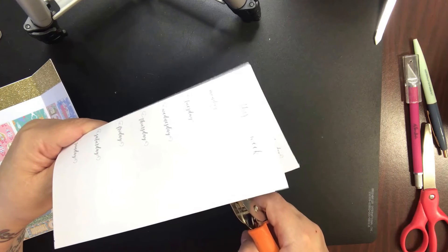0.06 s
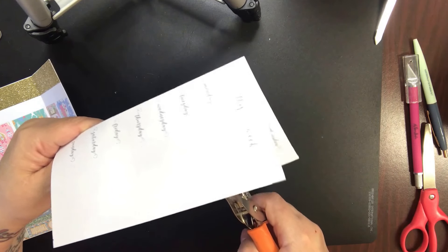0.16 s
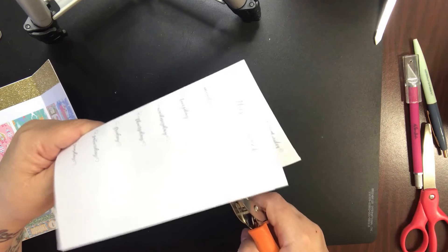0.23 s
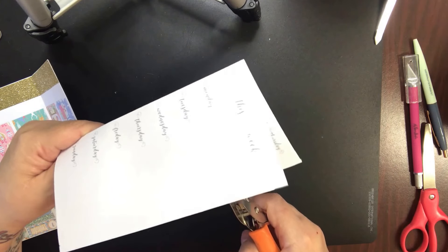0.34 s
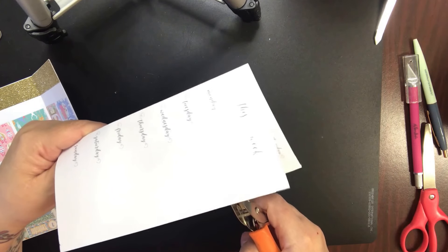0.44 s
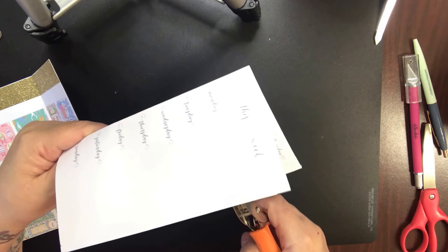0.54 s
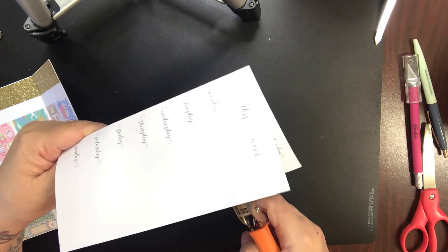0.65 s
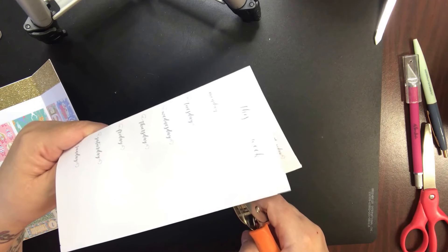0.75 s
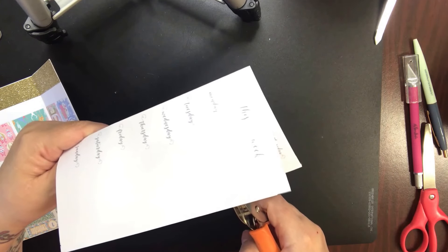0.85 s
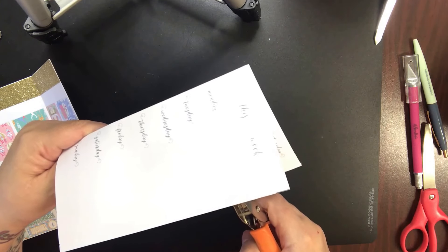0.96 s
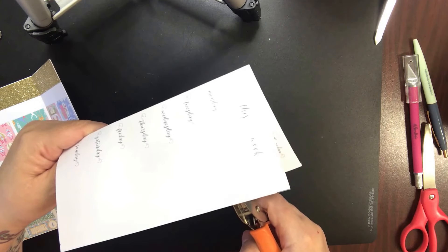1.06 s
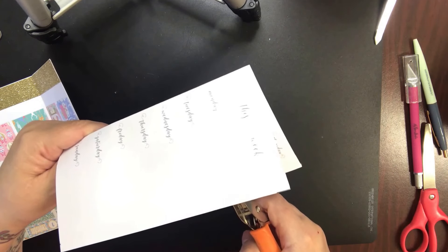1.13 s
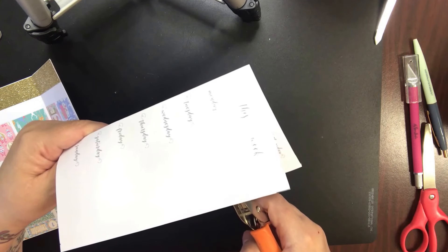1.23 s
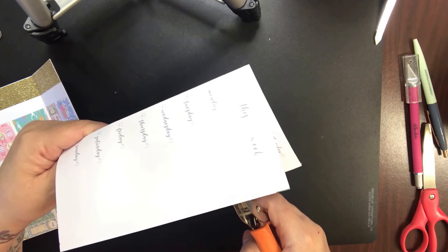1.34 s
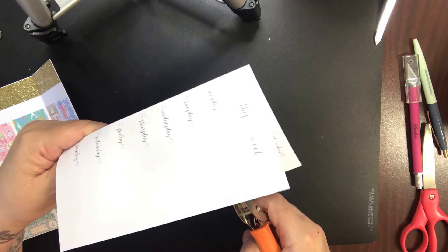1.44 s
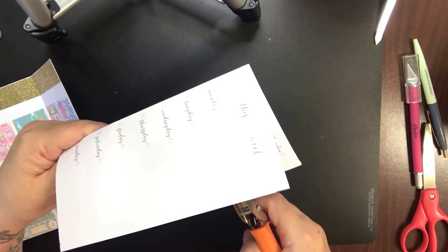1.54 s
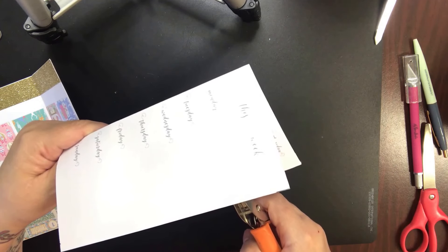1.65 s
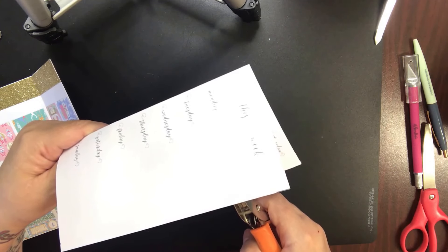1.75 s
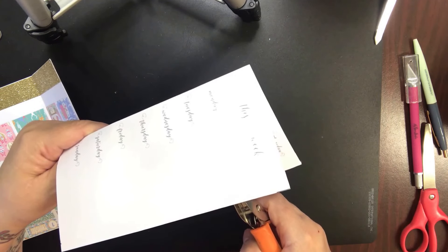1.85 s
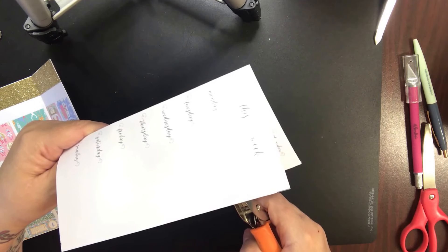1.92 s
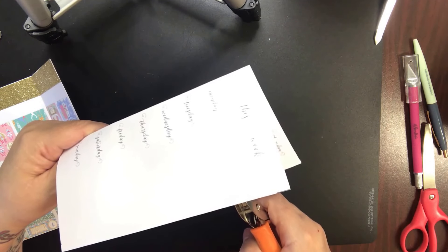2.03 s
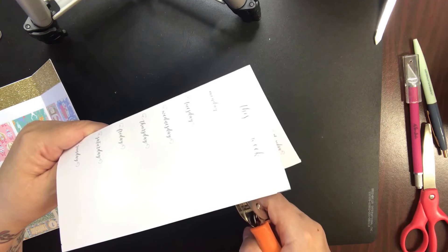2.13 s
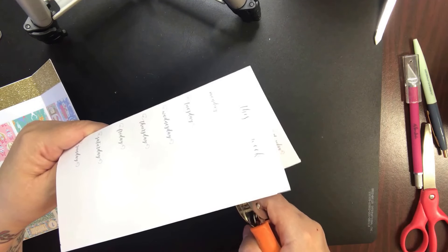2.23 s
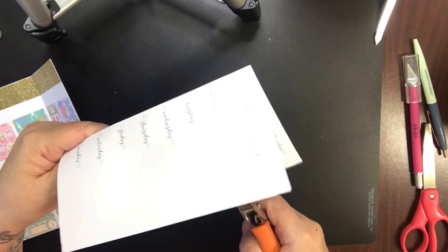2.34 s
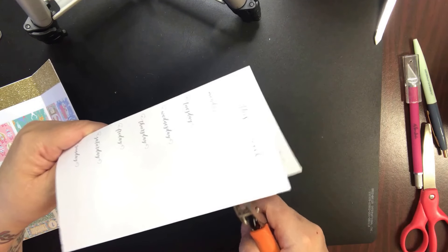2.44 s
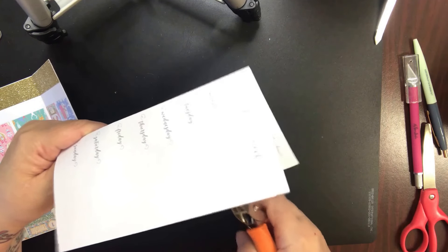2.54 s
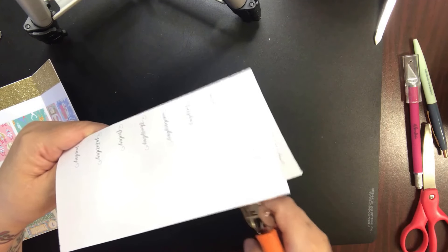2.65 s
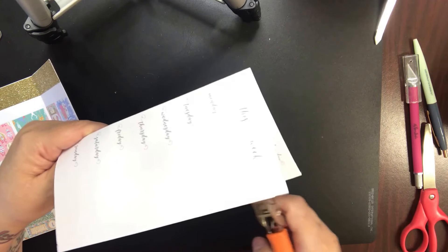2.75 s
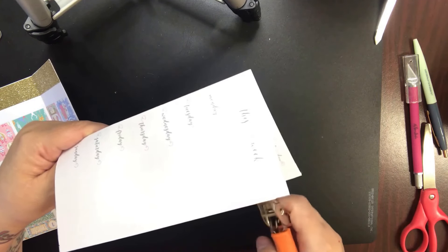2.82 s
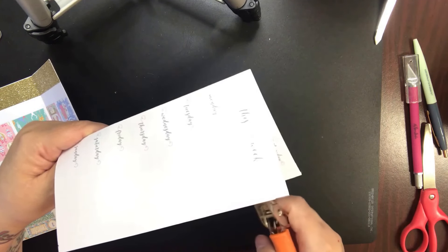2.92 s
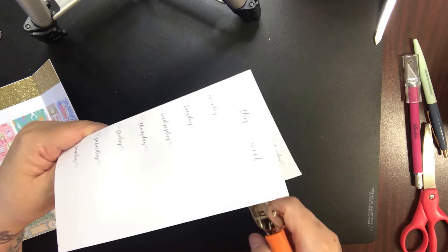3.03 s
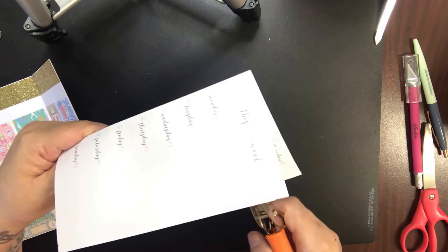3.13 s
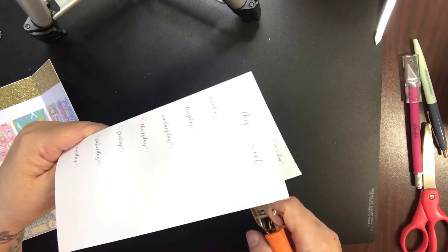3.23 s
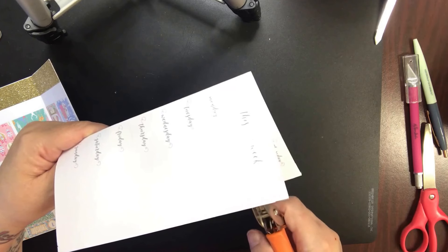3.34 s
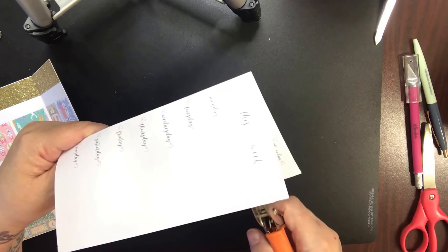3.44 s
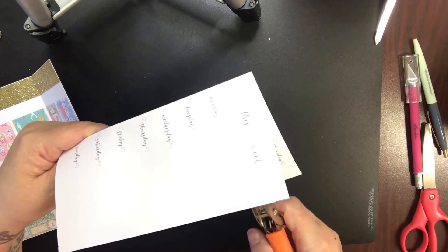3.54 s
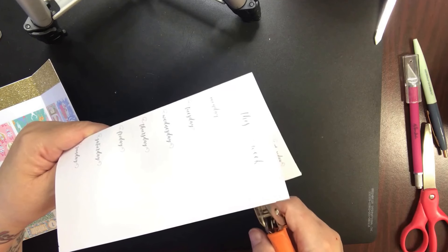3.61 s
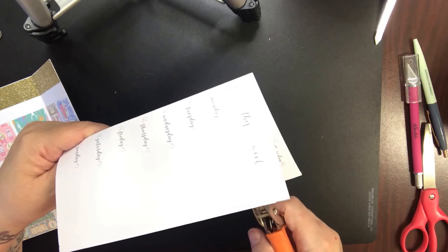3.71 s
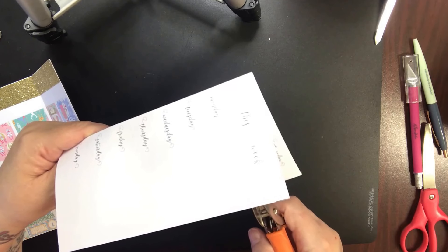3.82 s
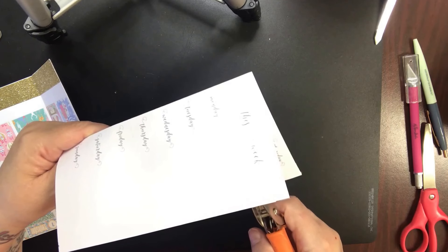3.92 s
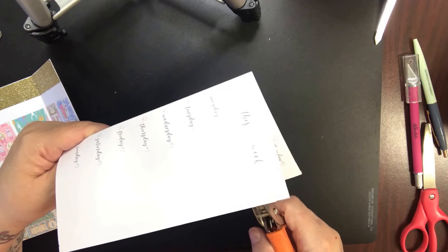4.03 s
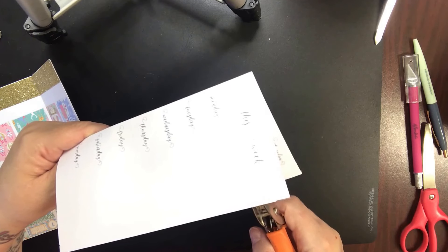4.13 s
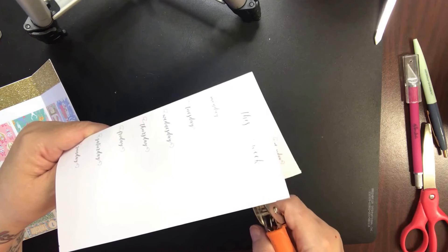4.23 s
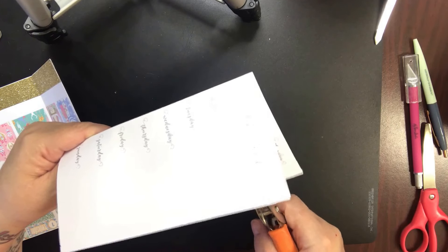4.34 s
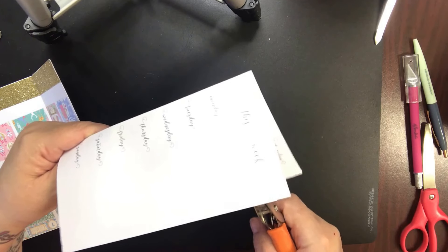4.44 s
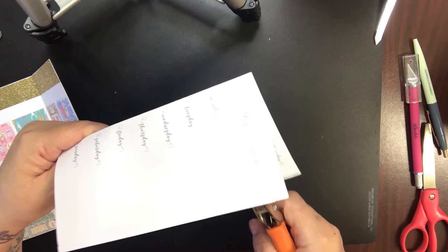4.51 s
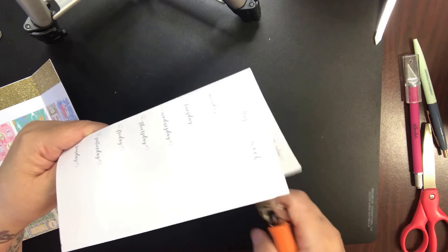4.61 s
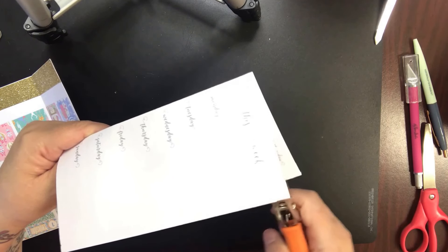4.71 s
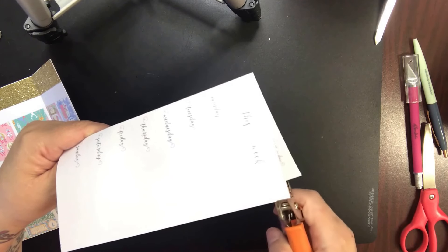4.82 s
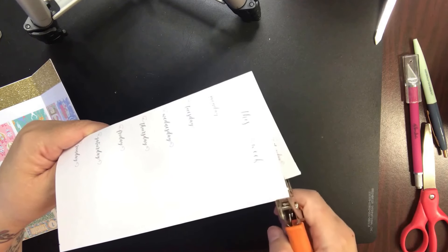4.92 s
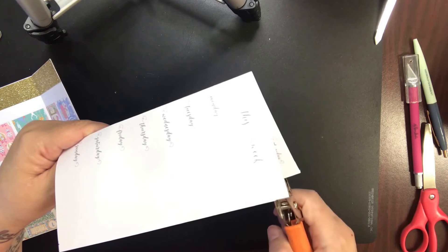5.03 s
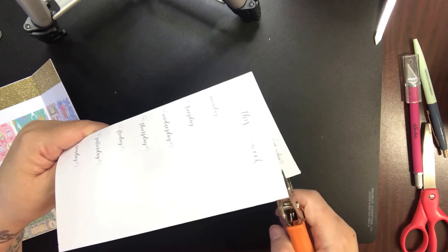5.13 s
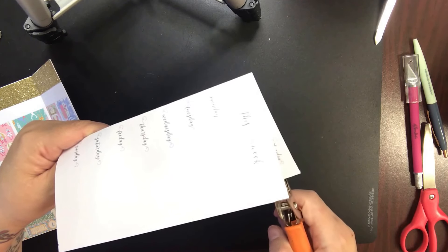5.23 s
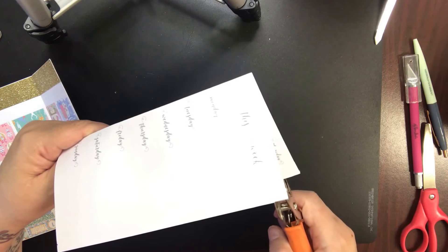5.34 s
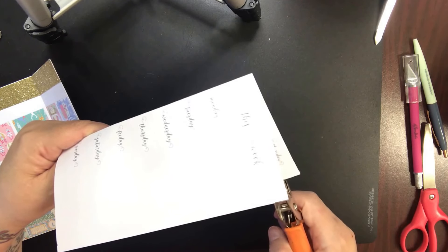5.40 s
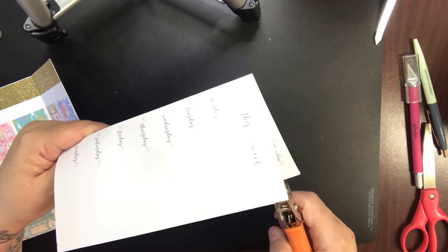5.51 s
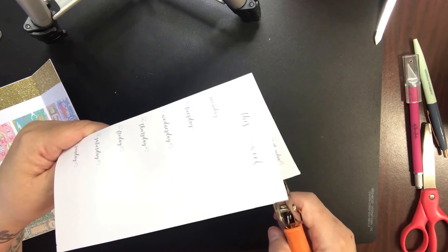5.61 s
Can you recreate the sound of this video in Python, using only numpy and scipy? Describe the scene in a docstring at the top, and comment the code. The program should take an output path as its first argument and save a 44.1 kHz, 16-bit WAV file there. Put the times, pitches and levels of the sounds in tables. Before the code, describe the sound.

A handheld metal hole punch crunches twice through paper with sharp clicks and spring-back snaps, over a low throbbing hum in a small room.

```python
"""Hole punch in a small room

A steel hole punch is squeezed twice through paper held above a desk: after a soft handling tick, the jaws close
on the sheets, the pin shears through, the spring pulls it back and the punch slides off the paper. Each contact
is a burst of dense tiny impacts with a steel ring and a paper boom; the rubbing and creaking paper is grainy
noise in bands. Two motors, built from cosines, drone and beat over filtered noise: ventilation rush and
microphone hiss.
"""
import sys
import numpy as np
from scipy import signal
from scipy.fft import rfft, irfft, next_fast_len
from scipy.io import wavfile
from scipy.ndimage import map_coordinates

SR = 44100
rng = np.random.default_rng(int(sys.argv[2]) if len(sys.argv) > 2 else 0)


def dump_mix(stems):
    """Bounce the given channels to the path in sys.argv[1] as a 16-bit WAV at rate SR."""
    frames = np.atleast_2d(stems).T  # one column per channel
    limited = np.clip(frames, -1, 1)  # hard clip at full scale
    pcm = np.round(limited * 32767).astype(np.int16)
    wavfile.write(sys.argv[1], SR, pcm)


N = 249870  # length of the scene in samples

# Ringing tones of the punch. Each row: pitch in Hz, relative level in dB, time to fade by 60 dB in s.
STEEL_TONES = [(1040, -1, .07), (1300, -14, .07), (1448, 0, .056), (2150, -17, .045), (3450, -24, .05),
               (5740, -25, .04), (7990, -30, .04), (9600, -30, .045)]
# Boom of the held sheets. Each row: centre in Hz, width in Hz, relative level in dB.
SHEET_BOOM = [(230, 80, -6), (360, 100, 0), (550, 130, -1), (715, 120, -1)]
# Hand-damped steel, the body of a click. Each row: centre in Hz, width in Hz, relative level in dB.
CLICK_BODY = [(1110, 970, -7), (1870, 400, 4), (2310, 448, 1), (3060, 160, -7), (3470, 265, -5.5),
              (4240, 160, -12.5), (4490, 230, -11.5)]
# Treble of a click. Each row: frequency in Hz, relative level in dB.
CLICK_TREBLE = [(2060, -23), (3500, -2.5), (4740, -2.5), (7020, -7), (7930, -16), (9260, -5.5),
                (9690, -14.5), (14900, -13.5), (16300, -22.5)]
# Knock of the clamped jaws. Each row: centre in Hz, width in Hz, relative level in dB.
JAW_KNOCK = [(990, 206, 0)]
# The four tables of steel contacts share their columns.
# Each row: time of the peak in s, peak of the click in dB, treble against the body in dB, rise in ms.
# The jaws meet; the first row is a soft tick as the punch and paper are handled:
LANDINGS = [(0.166, -43.5, -18, 2.9), (2.1639, -28.5, -5, 0.46), (4.1467, -34, -7, 0.32)]
# The pin digs into the sheets:
BITES = [(2.099, -56, 13, 1.1), (2.291, -41, 3, 1.4), (2.3, -35.5, 0.5, 2.7), (2.364, -33, -1, 2.4),
         (4.279, -52, -12, 1.3), (4.312, -33.5, -4, 3)]
# The pin breaks through:
SHEARS = [(2.380, -9, -12, 0.86), (4.399, -18.5, -5, 3.7)]
# The pin springs back and tugs the sheets; the row at 4.411 s is a bounce just after the second shear:
RETURNS = [(2.534, -50, -1, 1.2), (2.553, -41.5, -9, 1.4), (2.558, -41, -8, 2), (2.569, -31, -6, 0.72),
           (2.5783, -21, -3, 0.73), (4.411, -33.5, -6, 1.2), (4.5603, -48, -7, 1), (4.5807, -33, -22, 0.49),
           (4.611, -28.5, -8, 4), (4.615, -15.5, -8, 1.2), (4.624, -34, -8, 1.5)]
# What each group of contacts shares. Each row: its contacts, paper thud in dB, jaw knock in dB,
# ring in dB before the loss below, fall in ms.
STAGE_SETTINGS = [(LANDINGS, -44, -5, -5.5, 4.9), (BITES, -25, -3.5, -1.5, 4.5),
                  (SHEARS, -29, -1.1, -19, 3.75), (RETURNS, -5, -8.5, -23, 4.3)]
RING_LOSS_DB_PER_MS = 6.5  # the slower a contact builds, the less the steel rings


def punch():
    """Each contact is a few ms of grating steel that rings the punch and jolts the sheets."""
    out = np.zeros(N)
    t = np.arange(-SR // 50, SR // 6) / SR  # seconds from the peak of the contact
    for contacts, thud_db, jaw_db, ring_db, fall_ms in STAGE_SETTINGS:
        for peak_s, peak_db, treble_db, rise_ms in contacts:
            side_ms = np.where(t < 0, rise_ms, fall_ms)
            envelope = np.sqrt(np.exp(-np.abs(1000 * t / side_ms) ** 1.7))
            click = steel_click(envelope, jaw_db, treble_db)
            ring = amp(ring_db - RING_LOSS_DB_PER_MS * rise_ms) * steel_ring(t)
            jolt = filtered(burst(envelope), resonances(SHEET_BOOM))
            thud = amp(thud_db) * jolt / np.abs(jolt).max()
            contact = amp(peak_db) * (click + ring + thud)
            add(out, peak_s + t[0], surroundings(contact, wet_db=-14.5))
    return out


def steel_click(envelope, jaw_db, treble_db):
    """Tiny impacts shake the damped steel and the jaws; separate ones give the treble. The peak is 1."""
    push = burst(envelope)
    body = unit(filtered(push, resonances(CLICK_BODY)))
    knock = unit(filtered(push, resonances(JAW_KNOCK)))
    treble = unit(filtered(burst(envelope), lambda hz: amp(along(CLICK_TREBLE, hz))))
    click = body + amp(jaw_db) * knock + amp(treble_db) * treble
    return click / np.abs(click).max()


def steel_ring(t):
    """The steel's tones start at the peak and die at their own speeds; their levels vary by contact."""
    after = np.maximum(t, 0)
    ring = np.zeros(len(t))
    for hz, level_db, fade_s in STEEL_TONES:
        tone_db = level_db + rng.normal(0, 1.2) - 60 * after / fade_s
        ring += amp(tone_db) * np.sin(2 * np.pi * hz * after)
    return ring


# Paper rubbing on paper and steel.
# Each row: start in s, length in s, level in dB before the fades, centre in Hz.
PAPER_RUBS = [(0.143, 0.024, -68, 5800), (0.158, 0.045, -58.5, 3970), (0.209, 0.035, -67, 3320),
              (0.27, 0.021, -65, 2900), (0.434, 0.028, -56, 3940), (0.723, 0.029, -70, 3950),
              (0.864, 0.01, -71, 4940), (2.645, 0.034, -61, 5000), (2.662, 0.064, -54.5, 2940),
              (2.74, 0.062, -69, 5500), (2.973, 0.061, -65, 4270), (4.287, 0.04, -65, 7940),
              (4.647, .045, -61, 4000), (4.666, 0.041, -53.5, 6200), (4.7, 0.046, -53, 3600),
              (4.743, 0.072, -71.5, 4400), (5.251, 0.35, -77, 4180), (5.602, 0.041, -70.5, 4350)]
RUB_OCTAVES, WIDER_OCTAVES_PER_DB = 0.67, 0.018  # width of a -65 dB rub; harder rubs spread wider
# The squeezed sheets creak until just before the pin breaks through.
CREAK_LEAD_S, CREAK_S, CREAK_DB, CREAK_HZ, CREAK_OCTAVES = 0.076, 0.066, -63.5, 7350, 3.1


def paper():
    """Sliding sheets rub, and squeezed sheets creak before each shear."""
    out = np.zeros(N)
    for start_s, length_s, db, centre_hz in PAPER_RUBS:
        octaves = RUB_OCTAVES + WIDER_OCTAVES_PER_DB * (db + 65)
        rub = amp(db) * paper_stroke(length_s, centre_hz, octaves)
        add(out, start_s, surroundings(rub, wet_db=-13.0))
    for shear_s, *_ in SHEARS:
        creak = amp(CREAK_DB) * paper_stroke(CREAK_S, CREAK_HZ, CREAK_OCTAVES)
        add(out, shear_s - CREAK_LEAD_S, surroundings(creak, wet_db=-13.0))
    return out


def paper_stroke(length_s, centre_hz, octaves):
    """Fibres catch and let go: banded noise, chopped into uneven grains, fades in and out."""
    u = np.linspace(0, 1, round(length_s * SR))  # progress of the stroke
    bands_db = 3 * rng.standard_normal(60)  # each buckle of the sheet favours its own bands

    def colour(hz):
        """A broad hump around the centre, made uneven every 300 Hz."""
        distance = np.log2((hz + 1) / centre_hz) / octaves
        return np.exp(-0.5 * distance ** 2) * amp(np.interp(hz / 300, np.arange(len(bands_db)), bands_db))

    grains = amp(4 * noise(len(u), lambda hz: hz < 300))
    fades = np.clip(u / 0.2, 0, 1) * np.clip((1 - u) / 0.25, 0, 1)
    return fades * unit(grains * noise(len(u), colour))


SLOW_HZ, FAST_HZ, MAINS_HZ = 51.075, 58.92, 59.99
# Slower motor. Each row: order (multiple of the turning speed), level in dB.
SLOW_ORDERS = [(1, -59), (3, -57.5), (4, -59.5), (5, -65), (6, -69.5), (7, -75)]
# Faster motor above its first order. Each row: order, level in dB.
FAST_ORDERS = [(3, -82), (5, -73.5), (6, -64), (7, -74.5), (12, -91.5)]
# The faster motor's first order swells and sinks. Each row: time in s, level in dB.
FAST_ROOT_LEVELS = [(0, -65), (1.0, -60.5), (1.5, -58.5), (2.1, -60), (2.55, -74), (3.3, -68), (3.9, -65),
                    (4.3, -58), (5.67, -58.5)]
# Mains buzz. Each row: order (multiple of the mains frequency), level in dB.
MAINS_ORDERS = [(2, -68), (4, -82.5)]


def motors():
    """Two motors about 8 Hz apart throb together over a faint mains buzz."""
    time_s, root_db = np.transpose(FAST_ROOT_LEVELS)
    swell = amp(np.interp(np.arange(N) / SR, time_s, root_db))
    fast_root = swell * orders([(1, 0)], FAST_HZ, 0.0051, shaky_db=0.6)
    slow = orders(SLOW_ORDERS, SLOW_HZ, 0.0132, shaky_db=0.8)
    fast = orders(FAST_ORDERS, FAST_HZ, 0, shaky_db=0.14)
    buzz = orders(MAINS_ORDERS, MAINS_HZ, 0, shaky_db=0.0)
    return fast_root + slow + fast + buzz


def orders(table, hz, first_s, shaky_db):
    """Orders peak together once a cycle, with a wandering phase and levels that waver by shaky_db."""
    turn = 2 * np.pi * hz * (np.arange(N) / SR - first_s) + 0.17 * wobble(1.45)
    total = np.zeros(N)
    for order, db in table:
        level = np.sqrt(2) * amp(db + shaky_db * wobble(4.41))  # the root of 2 makes dB an rms level
        total += level * np.cos(order * turn)
    return total


# Ventilation. Each row: frequency in Hz, relative level in dB.
RUSH_COLOUR = [(15, -34), (25, -13), (59, -8), (97, -9), (133, -7.5), (165, -3.5), (295, -7), (400, -14),
               (480, -14), (800, -17.5), (1300, -15), (1650, -17), (1800, -24.5), (2600, -29.5),
               (5000, -120)]
# Duct resonances. Each row: centre in Hz, width in Hz, strength in dB.
DUCT_RESONANCES = [(172, 9, 9), (410, 25, 4), (700, 60, 4)]
# Microphone hiss. Each row: frequency in Hz, relative level in dB.
HISS_COLOUR = [(1060, -32), (1800, -24), (2200, -3), (2580, -3), (2800, -0.5), (3840, -1.5), (4790, -3.5),
               (6310, -5), (10300, -11.5), (11300, -10.5), (14600, -12), (15700, -13), (16300, -36)]


def air():
    """Ventilation rush through the duct resonances, and smooth microphone hiss, drift a little in level."""
    def ducts(hz):
        """Gain of the ducts: 1 plus a peak at each resonance."""
        return 1 + sum(amp(db) * peak(hz, centre, width) for centre, width, db in DUCT_RESONANCES)

    rush = noise(N, lambda hz: amp(along(RUSH_COLOUR, hz)) * ducts(hz))
    hiss = noise(N, lambda hz: amp(along(HISS_COLOUR, hz)))
    return amp(-57.5 + 0.9 * wobble(2.91)) * rush + amp(-73.5 + 0.5 * wobble(3.17)) * hiss


def surroundings(dry, wet_db):
    """A near sound with its bounces off the desk and the nearest wall, and the answer of the room."""
    heard = amp(wet_db) * room(dry)
    add(heard, 0, dry)
    add(heard, 0.0021, amp(-21.0) * dry)  # desk
    add(heard, 0.0105, amp(-17.5) * dry)  # nearest wall
    return heard


# How fast the room fades. Each row: frequency in Hz, time to fade by 60 dB in s.
ROOM_FADE = [(300, 0.15), (1000, 0.28), (3000, 0.37), (8000, 0.26), (15000, 0.31)]
# What the walls send back. Each row: frequency in Hz, relative level in dB.
WALL_COLOUR = [(200, 6), (600, 1), (1000, 2), (3000, -2), (7000, 0.5), (15000, -2.5)]


def room(x):
    """A fresh diffuse tail starts 9 ms late, and each frequency in it dies at its own speed."""
    hz, t, grid = signal.stft(rng.standard_normal(SR // 2), SR, nperseg=256)
    fade_db = along(WALL_COLOUR, hz)[:, None] - 60 * t / along(ROOM_FADE, hz)[:, None]
    tail = signal.istft(grid * amp(fade_db), SR, nperseg=256)[1]
    tail = tail * amp(1.8 * noise(len(tail), lambda f: f < 150))  # echoes arrive in uneven clumps
    echoes = signal.fftconvolve(x, tail / np.linalg.norm(tail))
    return np.pad(echoes, (round(0.009 * SR), 0))


def burst(envelope):
    """Dense micro-impacts under an envelope; their sum has an evener spectrum than plain noise."""
    x = envelope * rng.standard_normal(len(envelope))
    spectrum = rfft(x)
    even = irfft(spectrum / (np.abs(spectrum) + 1e-9), len(x))  # keep the phases, level the strengths
    return envelope * even


def amp(db):
    """Gain of a dB value."""
    return 10 ** (np.asarray(db) / 20)


def unit(x):
    """Scale a sound to rms 1."""
    return x / np.sqrt(np.mean(x ** 2) + 1e-20)


def along(points, hz):
    """Read values between (Hz, value) points on a log frequency axis."""
    point_hz, values = np.transpose(points)
    return np.interp(np.log(hz + 1), np.log(point_hz + 1), values)


def filtered(x, response):
    """Filter x by a response, real or complex, given as a function of frequency."""
    m = next_fast_len(x.shape[-1] + 8192)  # spare room for ringing
    spectrum = rfft(x, m) * response(np.fft.rfftfreq(m, 1 / SR))
    return irfft(spectrum, m)[..., :x.shape[-1]]


def noise(length, response):
    """Coloured noise of rms 1."""
    return unit(filtered(rng.standard_normal(length), response))


def wobble(rate):
    """A smooth random curve through `rate` random points a second."""
    points = rng.standard_normal(int(N * rate / SR) + 4)
    return map_coordinates(points, [np.arange(N) * rate / SR])


def peak(hz, centre, width):
    """A smooth peak of height 1 around a centre frequency."""
    return 1 / (1 + ((hz - centre) / width * 2) ** 2)


def resonances(modes):
    """Response of (Hz, width, dB) resonances that ring only after a push; signs alternate."""
    def response(f):
        """Sum of the resonances at frequency f."""
        total = 0
        for k, (centre, width, db) in enumerate(modes):
            damping = 1j * f * width
            total = total + (-1) ** k * amp(db) * damping / (centre * centre - f * f + damping)
        return total
    return response


def add(track, s, piece):
    """Mix a piece into the track at s seconds, cut off at the end of the track."""
    part = track[round(s * SR):][:len(piece)]
    part += piece[:len(part)]


def scene():
    """Punch and paper near the microphone, the drone of the room behind."""
    return (punch() + paper() + motors() + air())[None]


# Colour of the microphone housing. Each row: centre in Hz, width in Hz, boost or cut in dB.
MIC_HOUSING = [(4810, 350, -5), (5670, 390, 1.5), (10500, 280, -9.5)]
TOP_HZ = 15950  # the treble drops by 22 dB here and ends 520 Hz higher


def record(dry):
    """The microphone cuts the deep bass, is coloured by its housing and limits the treble."""
    def microphone(hz):
        """Gain of the housing and of the bass cut at about 40 Hz."""
        housing_db = sum(db * peak(hz, centre, width) for centre, width, db in MIC_HOUSING)
        return amp(housing_db) / (1 + (40 / (hz + 1)) ** 5)

    heard = filtered(dry, microphone)
    return filtered(heard, lambda hz: np.where(hz < TOP_HZ, 1, amp(-22) * (hz < TOP_HZ + 520)))


dry = scene()
out = record(dry)
dump_mix(out)
```